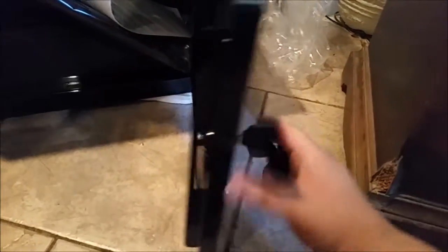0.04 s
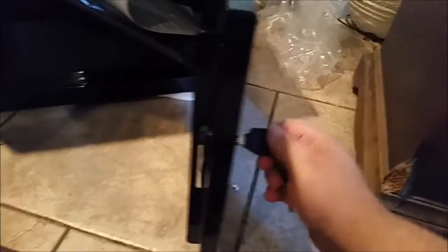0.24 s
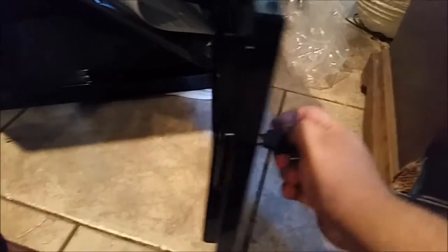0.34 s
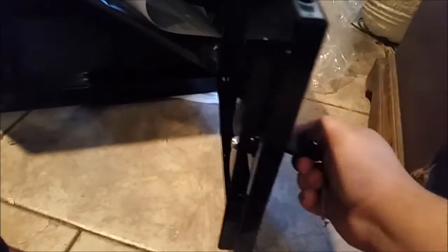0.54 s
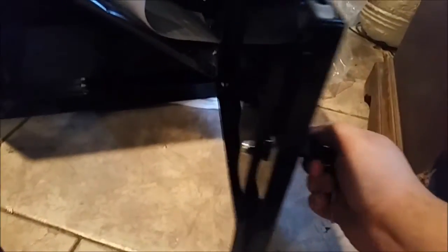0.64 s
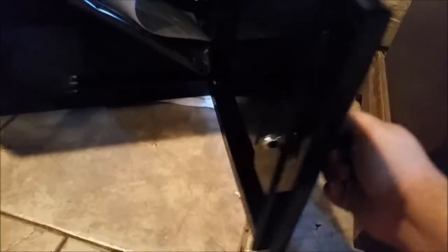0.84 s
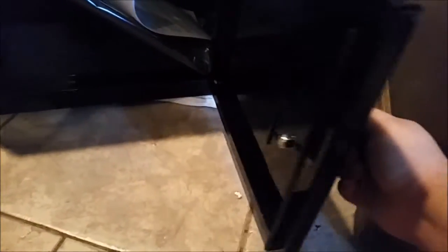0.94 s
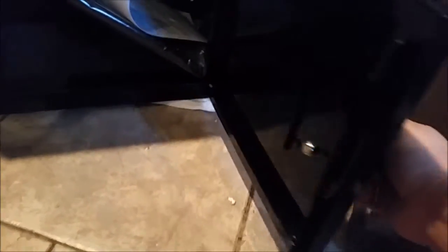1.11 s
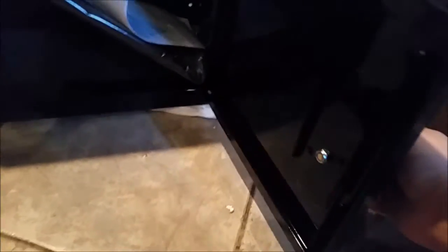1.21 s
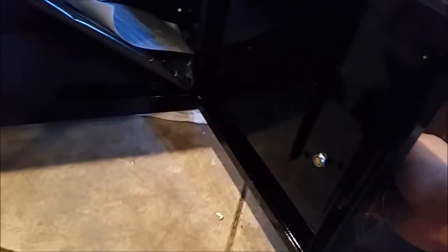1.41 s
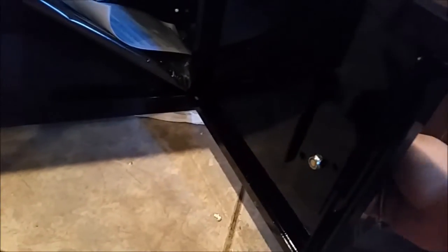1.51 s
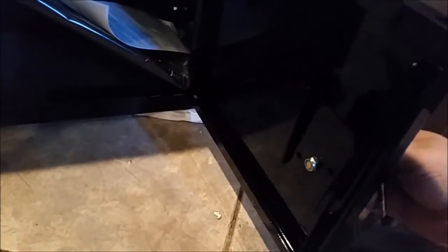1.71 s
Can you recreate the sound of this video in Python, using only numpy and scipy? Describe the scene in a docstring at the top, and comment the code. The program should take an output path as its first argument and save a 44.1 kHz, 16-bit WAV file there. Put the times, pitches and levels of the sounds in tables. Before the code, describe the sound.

A metal cabinet door is unlatched close by, slightly left. From 0.1 seconds the handle turns with a scrape, small knocks and dull panel thumps. At about 0.5 seconds the latch releases with a loud, rattling clunk and a low ring that dies away. The door swings with a soft rub, clicking between 0.8 and 1 seconds and faintly near 1.3. A low hum sits quietly in the small room.

```python
"""Opening a steel cabinet door

A hand turns the handle of a sheet-steel cabinet close by, in a tiled room with a low hum. The shaft
scrapes by stick-slip friction, and the strained panels pop and boom in their normal modes. The latch
lets go with a clunk and the door shudders free, then swings open, rubbing softly, its latch clicking."""
import sys
import numpy as np
from scipy import signal
from scipy.fft import rfft, irfft
from scipy.io import wavfile

SR = 44100
rng = np.random.default_rng(int(sys.argv[2]) if len(sys.argv) > 2 else 0)


def generate_wav(signal):
    """Clip the signal to [-1, 1] and save it as 16-bit WAV at the path in sys.argv[1]."""
    frames = np.transpose(np.atleast_2d(signal))
    scaled = np.clip(frames, -1, 1) * 32767
    pcm = np.round(scaled).astype(np.int16)
    wavfile.write(sys.argv[1], SR, pcm)


N = 77175
TIME = np.arange(N) / SR
HZ = np.fft.rfftfreq(N, 1 / SR)

# The door's crowd of overlapping modes. Each row: frequency in Hz, relative spectral density in dB.
CLANG_SPECTRUM = [(40, -27), (120, -9.5), (240, 1), (310, -12.5), (400, -3.5), (660, -11.5), (900, -1.5),
                  (1700, -1), (2700, -1), (3700, -7), (4700, -17), (7000, -21), (12500, -32.5),
                  (16000, -33)]
# The tick of the small steel latch. Each row: frequency in Hz, relative spectral density in dB.
SNAP_SPECTRUM = [(300, -18.5), (2000, -11), (3800, 1), (6500, -13), (9000, 0), (11000, -9), (12700, -2),
                 (16000, -16.5)]
LIGHT_SNAP_T60 = 0.033  # s


def amp(db):
    """Amplitude ratio: a factor of ten for every 20 dB."""
    return 10 ** (np.asarray(db) / 20)


def unit(x):
    """Normalisation to an rms of 1."""
    return x / np.sqrt(np.mean(x ** 2) + 1e-20)


def read(points, hz):
    """Interpolation of a table along a logarithmic frequency axis."""
    f, value = np.transpose(points)
    return np.interp(np.log(hz + 1), np.log(f + 1), value)


def colour(x, gains):
    """Zero-phase filtering by rows of frequency in Hz and gain in dB."""
    return irfft(rfft(x) * amp(read(gains, HZ)), N)


def add(mix, start, sound):
    """Superposition: a sound joins the mix at its start time in seconds."""
    part = mix[:, round(start * SR):][:, :sound.shape[-1]]
    part += sound[..., :part.shape[1]]


def fade(t60, size=N):
    """Exponential decay, by 60 dB in t60 seconds."""
    return np.exp(-np.log(1000) * TIME[:size] / t60)


def rise(seconds, size=N):
    """First-order build-up with the given time constant."""
    return 1 - np.exp(-TIME[:size] / seconds)


def noise(spectrum, t60=None, size=N):
    """Partly coherent noise at two microphone ports; a t60 table gives frequency-dependent damping."""
    # Likeness of the two ports. Each row: frequency in Hz, correlation from 0 to 1.
    coherence = [(60, 0.89), (250, 0.88), (600, 0.57), (1400, 0.175), (4000, 0.065), (15000, .1)]
    hz = np.fft.rfftfreq(size, 1 / SR)
    left, independent = rfft(rng.standard_normal((2, size)))
    shared = np.clip(read(coherence, hz), 0, 1)
    right = shared * left + np.sqrt(1 - shared ** 2) * independent
    x = unit(irfft(np.array([left, right]) * amp(read(spectrum, hz)), size))
    if t60 is None:
        return x
    f, t, frames = signal.stft(x, SR, nperseg=256)
    decay = amp(-60 * t / read(t60, f)[:, None])
    return signal.istft(frames * decay, SR, nperseg=256)[1][:, :size]


def ring(modes, size=N, start=0):
    """Free vibration as a sum of damped modes; the start time keeps it in phase with earlier ringing."""
    power = sum(amp(db) ** 2 for _, db, _ in modes) / 2
    t = TIME[:size] + start
    tones = (amp(db) * fade(t60, size) * np.sin(2 * np.pi * hz * t) for hz, db, t60 in modes)
    return sum(tones) / np.sqrt(power)


def burst(spectrum, t60, size=4096):
    """An impact transient: exponentially damped noise, heard as a metallic tick."""
    return noise(spectrum, size=size) * fade(t60, size)


def background():
    """Stationary room noise and a low hum that wavers by slow random phase modulation."""
    # Room noise. Each row: frequency in Hz, relative spectral density in dB.
    spectrum = [(20, -17), (45, -18), (75, -4.5), (100, -1), (130, -10), (200, -8.5), (260, -18),
                (340, -14.5), (600, -24.5), (1100, -33.5), (1600, -31), (2700, -48.5), (3500, -32),
                (5000, -48), (8000, -67.5), (10500, -55), (13500, -43), (16000, -52.5)]
    # Hum tones. Each row: frequency in Hz, level in dB.
    tones = [(58.4, -43.5), (97, -51.5)]
    hum = 0
    for hz, db in tones:
        waver = unit(irfft(rfft(rng.standard_normal(N)) * np.exp(-(HZ / 4) ** 2), N))
        depth_rad = 0.0678 * (hz / tones[0][0]) ** 2
        hum = hum + amp(db) * unit(np.sin(2 * np.pi * hz * TIME + depth_rad * waver))
    return amp(-43.5) * noise(spectrum) + hum


def reverberation(x, size=32768):
    """The diffuse field of a small tiled room: convolution with a decaying noise tail."""
    # Each row: frequency in Hz, reverberation time in seconds.
    decay_times = [(100, 1), (1000, 0.38), (4000, 0.52), (14000, 0.43)]
    tail = noise([(20, 0), (20000, 0)], decay_times, size) * rise(0.0095, size)
    return signal.fftconvolve(x, tail / np.linalg.norm(tail[0]), axes=1)[:, :N]


def friction(levels, spectrum, slips_per_s, slip_t60):
    """Stick-slip friction: random slips of uneven size, each a puff of noise, add in power."""
    slipping = rng.random(N) < slips_per_s / SR
    slips = slipping * amp(2.5 * np.minimum(rng.exponential(1, N), 2))
    puff = TIME * fade(slip_t60)
    power = abs(signal.fftconvolve(slips ** 2, puff ** 2)[:N])
    envelope = amp(np.interp(TIME, *np.transpose(levels), left=-120, right=-120))
    return envelope * unit(np.sqrt(power) * noise(spectrum))


def door_swing():
    """Sliding friction of the swinging door and arm: sparse, long slips make a soft rub."""
    # Each row: time in seconds, level in dB.
    levels = [(.6, -45), (.8, -50), (1.05, -51.5), (1.45, -54.5), (1.75, -64.5)]
    # Each row: frequency in Hz, relative spectral density in dB.
    spectrum = [(180, 6.5), (420, 7.5), (700, -4.5), (1600, -1), (2400, -9), (4500, -22), (8000, -40)]
    return friction(levels, spectrum, slips_per_s=60, slip_t60=0.045)


def shaft_scrape():
    """Stick-slip friction of the handle's shaft: dense, short slips merge into a scrape."""
    # Each row: time in seconds, level in dB.
    levels = [(.085, -46.5), (.105, -44.5), (.15, -36.5), (.18, -41.5), (.29, -43.5), (.325, -46.5),
              (.365, -38), (.405, -47.5), (.46, -44.5)]
    # Each row: frequency in Hz, relative spectral density in dB.
    spectrum = [(100, 4.5), (380, 12), (520, 2.5), (1600, 1), (4300, -9.5), (6500, -25.5), (9000, -24),
                (13000, -16), (16000, -24.5)]
    return friction(levels, spectrum, slips_per_s=300, slip_t60=0.014)


def click_clusters(size=2048):
    """Dry knocks, each a cluster of close tones with a bright edge: the handle and latch knock while the handle
    turns, and the loose latch knocks in its play as the door swings open."""
    # Each row: start in seconds, knock level in dB, knock pitch in Hz, snap level in dB.
    clicks = [(.219, -27.5, 1108, -48), (.336, -34.5, 615, -55.5), (0.345, -36, 2490, -76),
              (.350, -31, 4170, -63), (0.804, -62, 3070, -46), (0.8155, -22, 2580, -35),
              (0.868, -34.5, 2340, -54.5), (0.9148, -38.5, 5000, -46), (0.919, -37.5, 2370, -56),
              (.949, -41.5, 7000, -46.5), (1.272, -39.5, 3040, -58)]
    step_octaves, step_db, knock_t60 = 0.159, -10.5, 0.011
    out = np.zeros((2, N))
    for start, knock_db, hz, snap_db in clicks:
        cluster = [(hz * 2 ** (k * step_octaves), abs(k) * step_db, knock_t60) for k in range(-2, 3)]
        add(out, start, amp(knock_db) * rise(0.000318, size) * ring(cluster, size))
        add(out, start, amp(snap_db) * burst(SNAP_SPECTRUM, LIGHT_SNAP_T60))
    return out


def latch_snap(t60, size=4096):
    """Impact excitation of the latch: a tick and a thin steel ring, damped by the hand."""
    # Each row: frequency in Hz, relative level in dB, t60 in seconds without the hand.
    modes = [(4460, -14.5, 0.13), (4610, -5, .07), (8850, -6, 0.11), (9160, -4, .1), (10300, 8, 0.11),
             (11590, 10.5, 0.068), (12300, -2, 0.044)]
    hand_damping = fade(2 * t60, size)
    return burst(SNAP_SPECTRUM, t60, size) + amp(-8) * ring(modes, size) * hand_damping


def knocks_and_scuffs():
    """Damped resonance: hollow knocks as the handle turns, soft scuffs and taps as the door opens."""
    # Each row: start in seconds, knock level in dB, snap level in dB.
    knocks = [(0.086, -56, -51), (0.0973, -32, -69), (0.1007, -23.5, -64), (.137, -54.5, -47.5),
              (0.15, -37, -48.5), (.165, -57.5, -48.5), (.2218, -37.5, -28), (0.371, -42, -73),
              (.95, -41, -72), (1.41, -47.5, -79), (1.029, -50, -71), (1.07, -42, -67.5), (1.269, -42, -67)]
    # The hollow resonance. Each row: frequency in Hz, relative level in dB, t60 in seconds.
    hollow_modes = [(865, 4, 0.029), (1504, -2.5, 0.081), (1622, 2.5, 0.044), (1840, -2.5, 0.048),
                    (2455, 2, 0.03)]
    hollow = rise(0.00146) * ring(hollow_modes)
    out = np.zeros((2, N))
    for start, knock_db, snap_db in knocks:
        contact = amp(knock_db - 10) * burst(CLANG_SPECTRUM, t60=0.038)
        add(out, start, amp(knock_db) * hollow)
        add(out, start, contact + amp(snap_db) * latch_snap(LIGHT_SNAP_T60))
    return out


def sheet_pops():
    """Elastic recoil: the strained sheet springs back with a dull pop in a single mode."""
    # Each row: start in seconds, level in dB, pitch in Hz, t60 in seconds.
    pops = [(.24, -20, 93, 0.19), (.511, -21, 385.7, 0.14), (.512, -18.5, 505, 0.061)]
    out = np.zeros((2, N))
    for start, db, hz, t60 in pops:
        add(out, start, amp(db) * rise(0.01) * ring([(hz, 0, t60)]))
    return out


def door_blows(size=24576):
    """Modal response to blows of latch and door: panels boom, the door skin clangs, the latch snaps."""
    # Each row: start in seconds, then levels in dB of panel boom, door clang and latch snap.
    blows = [(0.1067, -28.5, -36, -52.5), (.196, -26, -45.5, -57), (0.228, -19.5, -44.5, -60),
             (.249, -18, -55, -64.5), (0.3128, -20.5, -59, -72), (.356, -31, -51, -75),
             (.462, -63, -18, -20), (.469, -15.5, -22, -33), (.477, -37, -21.5, -44.5),
             (0.4877, -26, -24.5, -46.5), (0.5107, -22.5, -15, -31), (.5259, -25, -21, -39),
             (.534, -39.5, -23.5, -45), (0.553, -29, -44.5, -58)]
    # The large cabinet panels. Each row: frequency in Hz, relative level in dB, free t60 in seconds.
    panel_modes = [(97.9, -9, 0.76), (111.4, -6.5, 0.5), (146.1, -0.5, 0.35), (154.5, 4, 0.43),
                   (176.2, -2, 0.77), (194.1, -7, 1.146), (209.9, -6, 0.51), (232.1, 0, 0.55),
                   (299, -22.5, 1.07), (403, -14, 0.93)]
    # The door skin. Each row: frequency in Hz, relative level in dB, t60 in seconds.
    skin_modes = [(474, -12, 0.45), (541, -3, 0.25), (689, -9, 0.3), (815, -3, 0.2), (1002.2, 6, 0.26),
                  (1233, -3, 0.18), (1516, -5, 0.18), (1568, -3, 0.18), (1839, -2, 0.17), (2414, -5, 0.18),
                  (2608, -1, 0.18), (2983, -4, .2)]
    # Damping of the door's overlapping modes. Each row: frequency in Hz, t60 in seconds.
    clang_decay = [(150, 0.8), (500, 0.41), (1500, 0.22), (3500, 0.11), (8000, 0.19), (15000, 0.11)]
    release_s, latched_t60_ratio = 0.45, 0.43  # the panels ring shorter while the latch holds
    free = ring(panel_modes)
    latched = ring([(hz, db, latched_t60_ratio * t60) for hz, db, t60 in panel_modes])
    out = np.zeros((2, N))
    for start, boom_db, clang_db, snap_db in blows:
        panels = latched if start < release_s else free
        skin = amp(-10) * ring(skin_modes, size, start) + noise(CLANG_SPECTRUM, clang_decay, size)
        crack = amp(clang_db - 0.5) * burst(CLANG_SPECTRUM, t60=0.023)
        add(out, start, amp(boom_db) * rise(0.0049) * panels)
        add(out, start, amp(clang_db) * rise(0.001, size) * skin)
        add(out, start, crack + amp(snap_db) * latch_snap(t60=0.076))
    return out


def scene():
    """Time and level differences place the cabinet to the left; the diffuse field surrounds it."""
    # Direct sound at the right port. Each row: frequency in Hz, gain in dB.
    right_direct = [(60, -1), (200, -2.5), (400, -3.5), (700, -8), (1100, -14), (2500, -12.5), (4400, -10),
                    (8000, -6), (13000, 0)]
    # Reverberation and background at the right port. Each row: frequency in Hz, gain in dB.
    right_diffuse = [(60, 0.5), (400, -3), (1500, -2), (4000, -6), (13000, -1)]
    port_delay_s = 0.0001
    rubbing = shaft_scrape() + door_swing()
    cabinet = rubbing + knocks_and_scuffs() + door_blows() + sheet_pops() + click_clusters()
    delayed = irfft(rfft(cabinet[1]) * np.exp(-2j * np.pi * HZ * port_delay_s), N)
    diffuse = amp(-15) * reverberation(cabinet) + background()
    left = cabinet[0] + diffuse[0]
    right = colour(delayed, right_direct) + colour(diffuse[1], right_diffuse)
    return np.array([left, right])


def record(dry):
    """Band limiting: a linear-phase low-pass filter cuts off at 16 kHz."""
    lowpass = signal.firwin(401, 16000, window=("kaiser", 9), fs=SR)
    return signal.oaconvolve(dry, lowpass[None], "same")


dry = scene()
out = record(dry)
generate_wav(out)
```